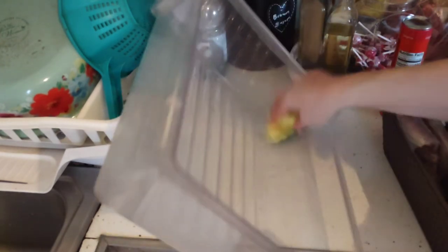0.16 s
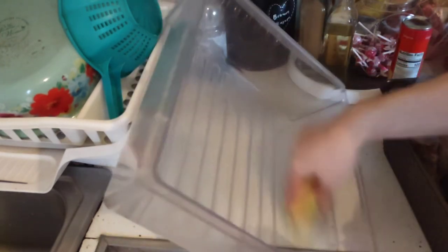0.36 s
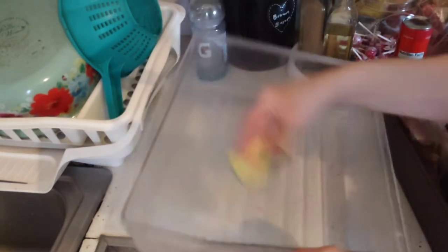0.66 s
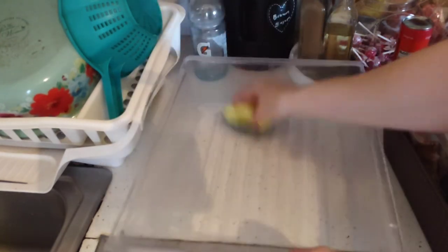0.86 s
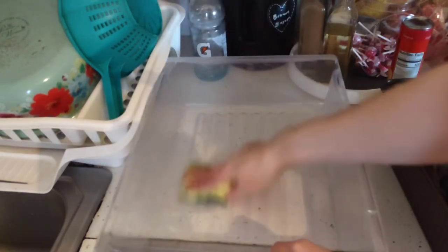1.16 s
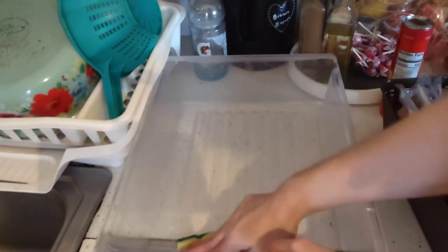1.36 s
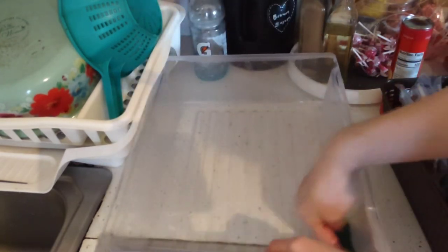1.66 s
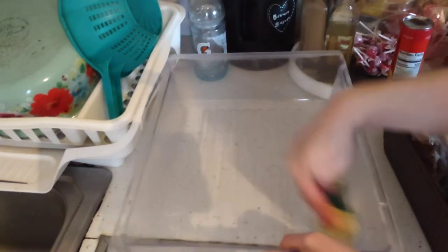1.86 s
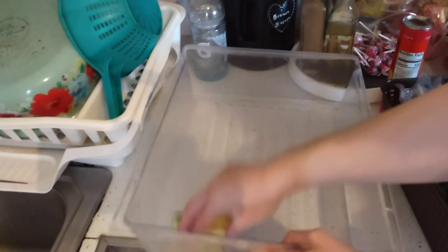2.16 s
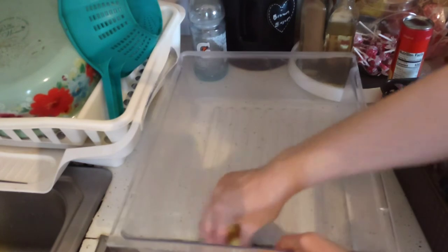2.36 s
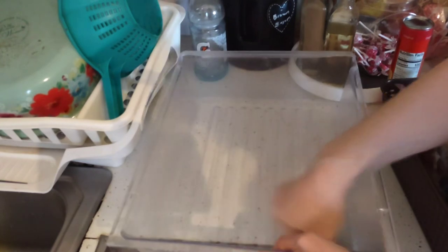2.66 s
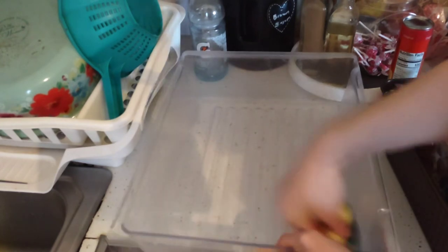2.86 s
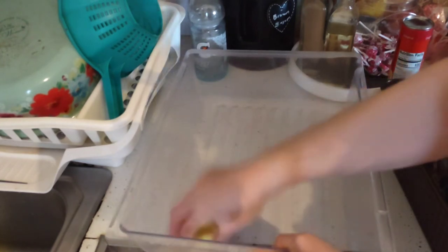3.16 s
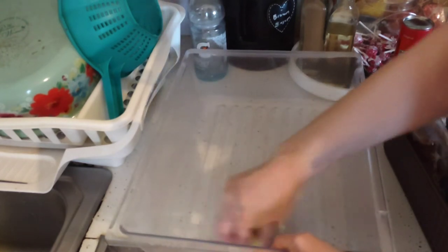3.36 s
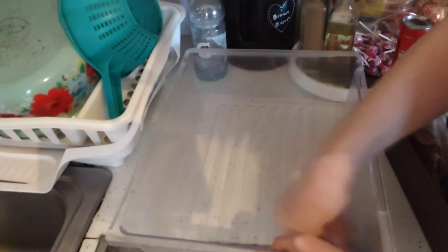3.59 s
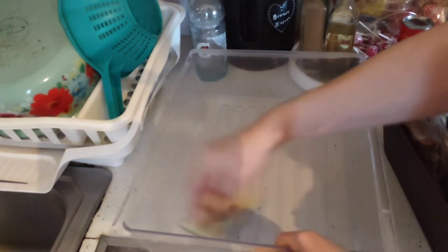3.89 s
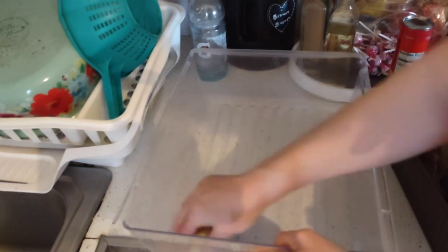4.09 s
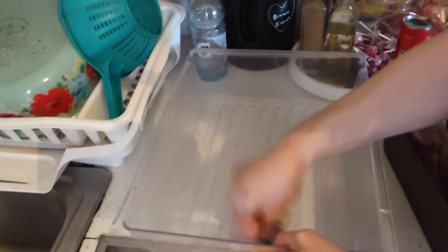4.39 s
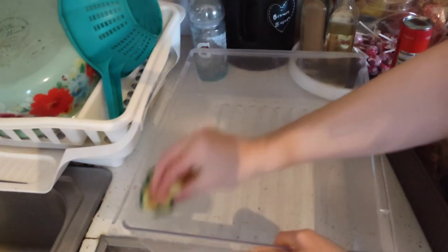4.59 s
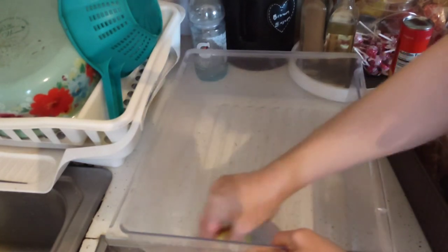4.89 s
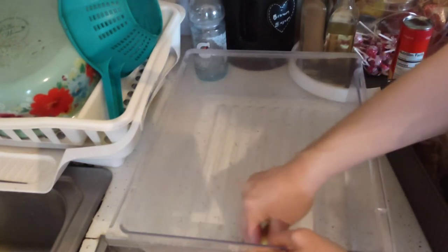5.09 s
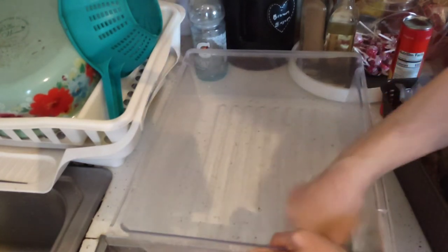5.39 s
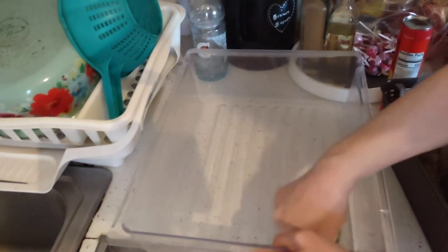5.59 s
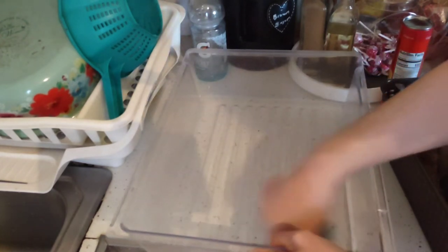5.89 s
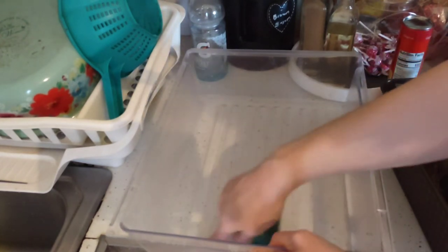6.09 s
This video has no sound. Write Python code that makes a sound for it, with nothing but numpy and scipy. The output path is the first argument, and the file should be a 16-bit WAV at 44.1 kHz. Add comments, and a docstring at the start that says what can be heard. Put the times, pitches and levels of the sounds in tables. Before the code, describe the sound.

Close-up scrubbing of a thin plastic bin: clattering as it is set down, then hissing wipes, resonant bumps and small squeaks over quiet room hum.

```python
"""A small kitchen with a low hum: a clear plastic drawer on the counter, scrubbed with a sponge.
Heard close, through two microphone ports, with a short room tail under the direct sound.
The drawer knocks as it is laid down and whenever the hand runs into a wall: decaying modes and noise.
Random snags of the sponge's fibres hiss and set the thin panels ringing; in the corners trains of
slips judder and swelling tones squeak."""
import sys
import numpy as np
from scipy import signal
from scipy.fft import rfft, irfft, next_fast_len
from scipy.io import wavfile
from scipy.ndimage import map_coordinates

SR = 44100
rng = np.random.default_rng(int(sys.argv[2]) if len(sys.argv) > 2 else 0)


def dump(signal):
    """Clip the signal to [-1, 1] and save it as 16-bit WAV at the path in sys.argv[1]."""
    limited = np.clip(np.atleast_2d(signal).T, -1, 1)
    pcm = np.round(limited * 32767).astype(np.int16)
    wavfile.write(sys.argv[1], SR, pcm)


N = 275184  # samples

# Levels in the tables are relative: most layers add a trim of their own in the mix.
# hum of the room, spectrum: f/Hz, level/dB
HUM_SPECTRUM = [(25, -36), (60, -16), (110, -11), (170, -6), (260, -1.5), (370, 3), (480, -10),
                (640, -13.5), (1000, -19.5), (2000, -32), (5000, -36.5), (10000, -65), (16000, -61)]
# decay of the kitchen: f/Hz, t60/s
KITCHEN_DECAY = [(100, 0.3), (500, 0.2), (3000, 0.22), (12000, 0.099)]
# likeness of left and right, 0-1: f/Hz, likeness
LEFT_RIGHT_LIKENESS = [(130, 0.96), (300, 0.92), (640, 0.43), (1200, 0.083), (3000, .02)]
# colour of each microphone port: f/Hz, level/dB
LEFT_PORT_COLOUR = [(330, 0), (520, 2), (780, 0), (1150, 3), (2700, 4), (4600, 3), (5450, 7), (6000, 2),
                    (7000, 3), (7700, -43), (8800, -1), (9400, 0), (10200, 10.5), (11900, 5.5),
                    (13200, -8.5), (15000, -9.5)]
RIGHT_PORT_COLOUR = [(330, 1), (520, 3), (780, 4.5), (1150, -2), (2700, 7), (4700, 1.5), (5450, 14.5),
                     (6200, 5), (7100, 9), (7800, 5), (8600, 16), (9400, -1), (10100, -21), (11400, -3.5),
                     (12100, -12), (12800, -13), (15000, -40)]
# broad wipes over the damp floor: t/s at full speed, hold/s, rise/s, fall/s, level/dB (20 dB ramps)
WIPE_GESTURES = [(0.209, 0.23, 0.073, 0.29, -51.5), (0.968, 0.43, 0.08, 0.16, -48)]
# swish of a wipe, spectrum: f/Hz, level/dB
SWISH_SPECTRUM = [(3000, -27), (7000, -8.5), (9000, -3), (10500, 1), (15000, -6)]
# damp plastic squeaking in the corner: t/s, length/s, level/dB
CORNER_SQUEAKS = [(1.794, 0.096, -42.5), (1.912, 0.044, -43.5)]
# tones of a squeak: f/Hz, level/dB
SQUEAK_PARTIALS = [(1700, -4), (2370, -4.5), (2640, -12), (5540, -12.5)]
# steady friction locked onto one panel mode: t/s, length/s, f/Hz, level/dB at the top of the swell
SINGING_MODES = [(1.5, 0.29, 661, -34.5), (1.516, 0.22, 395, -37.5), (1.626, 0.025, 647, -23.5),
                 (1.614, 0.043, 373.6, -29.5), (1.657, 0.019, 642, -21.5), (3.405, 0.037, 665, -36),
                 (3.455, 0.027, 692, -33), (4.156, 0.37, 1257, -48), (4.28, 0.11, 710, -39.5)]
# the sponge grips and slips: t/s, length/s, slip rate f/Hz, level/dB, roughness (0-1)
GRIP_SLIPS = [(1.763, 0.053, 137.7, -36.5, .7), (1.825, .036, 260.8, -28, 0.3),
              (1.858, 0.035, 245, -30, .2), (1.895, 0.066, 235, -44.5, .45), (2.739, 0.04, 120.5, -50, 0.2),
              (4.101, 0.054, 125, -60, 0.42), (5.366, 0.075, 131.4, -40, 0.35)]
# blows on the drawer: t/s, knock level/dB, counter thump level/dB, crack level/dB, contact pitch f/Hz
DRAWER_BLOWS = [(0.076, -72, -74, -39, 3480), (.269, -32, -48, -28, 1700), (.28, -33, -38.5, -42, 250),
                (.372, -48, -55, -37.5, 2300), (0.586, -32.5, -66, -24.5, 1720), (.591, -27, -65, -49, 344),
                (.624, -34, -48, -34, 587), (.765, -19.5, -33, -23, 1380), (.769, -24, -35, -38, 786),
                (0.787, -29.5, -31.5, -28, 420), (0.9, -32.5, -41, -58, 520), (.954, -21.5, -60, -23, 705),
                (1.185, -50, -62, -65, 685), (1.378, -53, -52, -38.5, 616), (1.763, -33, -57, -17, 2500),
                (1.803, -31.5, -65, -28, 710), (1.929, -46, -73, -53, 1100), (2.0, -42.5, -54, -66, 397),
                (2.246, -17, -38, -18, 1560), (2.254, -15.5, -25, -14, 530), (2.267, -17, -23, -17.5, 240),
                (2.291, -26.5, -35, -23, 230), (2.821, -37.5, -58, -39.5, 750), (2.864, -37, -55, -43, 800),
                (3.198, -31, -47.5, -45, 634), (3.662, -25.5, -40.5, -34, 660),
                (3.81, -29.5, -45, -27, 900), (4.085, -38.5, -61, -47, 1050),
                (4.104, -39, -41.5, -34.5, 765), (4.723, -48.5, -66, -59, 650),
                (5.552, -15.5, -33, -12.5, 675), (5.557, -19.5, -28.5, -40, 382),
                (5.598, -33, -40, -21.5, 750), (6.136, -54, -67, -74, 690)]
# ring of the drawer under a blow: f/Hz, level/dB, t60/s
DRAWER_MODES = [(243.6, -6.5, 0.27), (304, -5, 0.38), (346.7, 0, 0.2), (375.3, 2.5, 0.15), (421, 6, 0.19),
                (500, -3.5, 0.087), (613, -68, 0.054), (628.4, 3, 0.12), (681, 1, 0.12), (766.4, -8, 0.18),
                (859, -17, 0.38), (1004.6, 2.5, 0.13), (1083, -2.5, 0.094), (1363, -15, 0.095),
                (1564, -22, 0.12), (1627, -2.5, 0.053), (1810, -7.5, 0.067), (2025, -16, 0.049)]
# drawer and counter moving together: f/Hz, level/dB, t60/s
COUNTER_MODES = [(59, -25, 0.22), (104.7, 0.5, 0.17), (163, 5, 0.092), (202.4, 2.5, 0.13)]
# noise of a blow, spectra of its dense high modes and of its crack: f/Hz, level/dB
CLATTER_SPECTRUM = [(100, -10.5), (300, 3), (900, 2.5), (1800, -7.5), (3000, -11), (5000, -20.5),
                    (16000, -28.5)]
CRACK_SPECTRUM = [(300, 2), (1500, -14.5), (3000, -1), (7000, -0.5), (11000, -2.5), (16000, -15)]
# sponge strokes: t/s at full speed, hold/s, rise/s, fall/s (20 dB ramps), hiss level/dB,
# swell over the hold/dB, pressure/dB
SPONGE_STROKES = [(0.228, 0.06, 0.24, 0.12, -55, 17, 8.5), (0.51, 0.11, 0.26, 0.11, -62, -4, 17.5),
                  (0.898, 0.1, 0.054, 0.14, -54, 14, 5.5), (1.123, 0.046, 0.3, 0.19, -50.5, -6.5, -8),
                  (1.589, 0.094, 0.17, 0.071, -27.5, 10.5, 0), (1.776, 0.064, 0.075, 0.09, -46, -6.5, 14),
                  (1.974, 0.026, 0.057, 0.34, -70, -3, 19), (2.417, 0.19, 0.17, 0.1, -32, -7, -0.5),
                  (2.64, 0.081, 0.024, 0.12, -30, 0, -1), (3.342, 0.068, 0.11, 0.24, -33, 3.5, -3),
                  (3.417, 0.055, 0.022, 0.076, -35, -1, 4.5), (3.555, 0.074, 0.3, 0.15, -34, 3.5, 3.5),
                  (4.282, 0.12, 0.16, 0.043, -34.5, 2.5, 1), (4.757, 0.0086, 0.075, 0.025, -49, -1, -15),
                  (4.944, 0.15, 0.12, 0.14, -32, -6, -3), (5.184, 0.029, 0.018, 0.077, -41.5, -6, 4),
                  (5.282, 0.066, 0.12, 0.066, -30, 8, 2), (5.486, 0.007, 0.036, 0.029, -33, 0.5, -1.5),
                  (5.601, 0.031, 0.084, 0.051, -27.5, 5, 4), (5.7, 0.015, 0.067, 0.063, -31.5, 0, -5),
                  (5.79, 0.021, 0.031, 0.064, -32.5, -4, 4.5), (5.867, 0.023, 0.047, 0.12, -48, -1.5, -4)]
# hiss of the fibres, spectrum: f/Hz, level/dB
FIBRE_SPECTRUM = [(300, -33), (900, 3.5), (1600, -6.5), (2100, -5), (2700, 1), (4200, 1), (7000, 3),
                  (11000, 4.5), (16000, -3.5)]
# resonances of the panel under the sponge, and of the whole shell: f/Hz, width/Hz, level/dB
PANEL_RESONANCES = [(678, 44, -11.5), (701.3, 22.4, 2), (832, 87, -5.5), (1057, 70, -1.5),
                    (1238, 22, -12.5), (1435, 54, -10.5), (1634, 52, -13.5)]
SHELL_RESONANCES = [(317, 45, -23), (389, 20, -2), (418, 24, -2.5), (482, 16, -3.5)]

TOP_HZ = 15700  # band limit of the microphones
# each part against the hiss: level, growth toward the wall, and length of its fall as a ratio
PANEL_DB, PANEL_LEAN_DB_PER_S, PANEL_LINGER = -2.5, 37.5, 0.81
SHELL_DB, SHELL_LEAN_DB_PER_S, SHELL_LINGER = -13, 51.5, 1.8
SHELL_GROWS = 1.54  # dB of shell drone per dB of pressure
REST_HISS_DB, REST_PANEL_DB = -71, -69  # the sponge creeping between strokes, before the trims
NODES_DB, NODES_PER_S = 5.5, 12  # depth and rate at which a panel mode fades at its nodes
FOCUS_DB = 4  # loss of a mode an octave from the contact's pitch
# the whole shell giving way after each contact: delay, level, pitch, loss an octave away
FOLLOW_S, FOLLOW_DB, FOLLOW_HZ, FOLLOW_FOCUS_DB = 0.00565, -7, 380, 9
# time constant of a hard contact; dB of stretch per dB that the crack lies under the knock
ATTACK_S, SOFTENING = 0.00053, 0.62
SLOWING = 0.91  # slip rate at the end of a judder over that at its start
DRIFT = 0.012  # share by which a singing pitch wanders with the pressure


def amp(db):
    """Decibels to gain."""
    return 10 ** (np.asarray(db) / 20)


def unit(x):
    """Scale to rms 1."""
    return x / np.sqrt(np.mean(x ** 2) + 1e-20)


def along(points, hz):
    """Read (f/Hz, value) points on a log frequency axis."""
    f, value = np.transpose(points)
    return np.interp(np.log(hz + 1), np.log(f + 1), value)


def wobble(rate):
    """A smooth random curve with `rate` knots a second."""
    knots = rng.standard_normal(int(N * rate / SR) + 4)
    return map_coordinates(knots, [np.arange(N) * rate / SR])


def filtered(x, response):
    """Multiply the spectrum of x by a complex response of frequency."""
    n = x.shape[-1]
    padded = 2 * next_fast_len(n // 2 + 8192)
    spectrum = rfft(x, padded) * response(np.fft.rfftfreq(padded, 1 / SR))
    return irfft(spectrum, padded)[..., :n]


def colour(points):
    """Causal minimum-phase response with the given (f/Hz, level/dB), by folding the cepstrum."""
    def response(hz):
        cepstrum = irfft(np.log(amp(along(points, hz))))
        half = len(cepstrum) // 2
        cepstrum[1:half] *= 2
        cepstrum[half + 1:] = 0
        return np.exp(rfft(cepstrum))
    return response


def resonances(modes):
    """Causal response of damped resonators (f/Hz, width/Hz, level/dB), summed."""
    def response(f):
        return sum(amp(db) * 1j * f * width / (centre * centre - f * f + 1j * f * width)
                   for centre, width, db in modes)
    return response


def spread(pair):
    """Blend two unrelated signals into left and right, alike in the bass and unlike in the treble."""
    def mid_and_side(hz):
        turn = np.arccos(np.clip(along(LEFT_RIGHT_LIKENESS, hz), -1, 1)) / 2
        return np.array([np.cos(turn), np.sin(turn)])
    mid, side = filtered(pair, mid_and_side)
    return np.array([mid + side, mid - side])


def noise(spectrum, size):
    """Coloured stereo noise of rms 1."""
    return unit(filtered(spread(rng.standard_normal((2, size))), colour(spectrum)))


def add(track, s, sound):
    """Mix a sound in at time s."""
    part = track[:, max(round(s * SR), 0):][:, :sound.shape[-1]]
    part += sound[..., :part.shape[-1]]


def walls(x, echo, count=14):
    """Quick reflections between the drawer's walls comb the treble and make it hollow."""
    paths = np.zeros((2, SR // 100))
    for ear in paths:
        delays = rng.integers(SR // 2000, len(ear), count)  # 0.5 to 10 ms
        ear[delays] = echo * rng.choice([-1, 1], count)
    echoes = signal.fftconvolve(x, paths, axes=1)[:, :x.shape[-1]]
    echoes = filtered(echoes, colour([(400, -12.5), (1300, 4.5)]))
    return (x + echoes) / np.sqrt(1 + count * echo ** 2)


def gesture(t, hold, rise, fall):
    """Level in dB of a hand movement at full speed from t = 0: rise, hold, fall."""
    return -20 * (np.maximum(-t, 0) / rise + np.maximum(t - hold, 0) / fall)


def hum():
    """The low hum of the kitchen: steady noise weighted to the bass."""
    return amp(-54.5) * noise(HUM_SPECTRUM, size=N)


def room(x):
    """The kitchen's short, diffuse answer: noise decaying at its own pace in each band."""
    hz, t, bands = signal.stft(rng.standard_normal((2, SR // 2)), SR, nperseg=256)
    decay = amp(-60 * t / along(KITCHEN_DECAY, hz)[:, None])
    tail = spread(signal.istft(bands * decay, SR, nperseg=256)[1])
    tail = np.pad(tail / np.linalg.norm(tail[0]), ((0, 0), (SR // 200, 0)))  # starts 5 ms late
    return signal.fftconvolve(x, tail, axes=1)[:, :N]


def wipes():
    """Drawn lightly over the damp floor, the sponge gives a fine, smooth swish."""
    t = np.arange(N) / SR
    level = sum(amp(db + gesture(t - s, hold, rise, fall)) for s, hold, rise, fall, db in WIPE_GESTURES)
    return level * noise(SWISH_SPECTRUM, size=N)


def squeaks():
    """A tight rub keeps a mode singing; the higher the mode, the more its pitch and strength rasp."""
    out = np.zeros((2, N))
    high = [(s, length, hz, db + tone_db)
            for s, length, db in CORNER_SQUEAKS for hz, tone_db in SQUEAK_PARTIALS]
    for s, length, hz, db in SINGING_MODES + high:
        swell = np.hanning(int(length * SR))
        n = len(swell)
        pitch = hz * (1 + DRIFT * wobble(30)[:n])
        pitch = pitch + 28 * (hz / 700) ** 0.85 * wobble(300)[:n]
        rasp = 1 + 0.31 * min(hz / 1500, 1) * wobble(381)[:n]
        tone = np.sin(2 * np.pi * np.cumsum(pitch) / SR)
        add(out, s, amp(db) * np.sqrt(2) * swell * rasp * tone)
    return out


def judders():
    """The gripping sponge slips in quick jerks that make the wall groan."""
    out, t = np.zeros((2, N)), np.arange(SR // 4) / SR
    wall = colour([(40, -25), (120, -1.5), (250, 5.5), (390, 7.5), (470, -13.5),
                   (1000, -15.0), (2500, -26.5), (8000, -46)])
    for s, length, slip_hz, db, rough in GRIP_SLIPS:
        rate = np.interp(t, [0, length], [slip_hz, SLOWING * slip_hz])
        rate = rate * np.exp(0.29 * rough * wobble(150)[:len(t)])
        slips = np.diff(np.floor(np.cumsum(rate) / SR), prepend=-1)  # one impulse a cycle
        swell = np.sqrt(np.abs(np.sin(np.pi * np.minimum(t / length, 1))))
        jerks = slips * swell * (1 + rough * rng.standard_normal(len(t)))
        groan = filtered(jerks, wall)
        # little sounds below the slip rate
        groan = filtered(groan, colour([(slip_hz / 2, -20), (0.93 * slip_hz, 0)]))
        add(out, s, amp(db) * unit(groan) * np.sqrt(length / t[-1]))
    return out


def ringing(modes, t, attack, contact_hz, focus_db, width):
    """Decaying modes at fresh strengths; those near the contact's pitch are struck hardest."""
    hz, db, t60 = np.transpose(modes)[:, :, None]
    chance = rng.standard_normal((3, len(modes), 1))
    gain = amp(db + 0.59 * chance[0] - focus_db * np.log2(hz / contact_hz) ** 2)
    phase = 2 * np.pi * hz * (1 + 0.016 * chance[1]) * t
    skew = width * np.minimum(hz / 1000, 1) * chance[2]  # short waves reach the ports out of step
    sign = (-1) ** np.arange(len(modes))[:, None]
    fade = sign * gain / np.linalg.norm(gain) * amp(-60 * t / t60)
    pair = np.array([np.sum(fade * np.sin(phase + side * skew), axis=0) for side in (-1, 1)])
    return pair * (1 - np.exp(-t / attack))


def knocks():
    """A blow pushes air, cracks, clatters in dense high modes, rings drawer and shell, thumps the counter."""
    out, t = np.zeros((2, N)), np.arange(SR // 2) / SR
    for s, db, thump_db, crack_db, contact_hz in DRAWER_BLOWS:
        u = np.pi * contact_hz * t
        push = np.sin(2 * u) * np.exp(-u / 2)
        push = filtered(push, colour([(20, -40), (70, -28.5), (280, 1)]))  # small panel, little bass
        ring = ringing(DRAWER_MODES, t, attack=0.0014, contact_hz=contact_hz,
                       focus_db=FOCUS_DB, width=0.85)
        follow = ringing(DRAWER_MODES, t, attack=0.00098, contact_hz=FOLLOW_HZ,
                         focus_db=FOLLOW_FOCUS_DB, width=0.5)
        thump = ringing(COUNTER_MODES, t, attack=0.003, contact_hz=130, focus_db=0, width=0.3)
        # each noise has a fast and a slow decay
        clatter_fade = amp(-60 * t / 0.02) + amp(-4.5 - 60 * t / 0.18)
        clatter = noise(CLATTER_SPECTRUM, size=len(t)) * clatter_fade * (contact_hz / 700) ** 0.27
        crack_fade = amp(-60 * t / 0.012) + amp(-18.5 - 60 * t / 0.064)
        crack = noise(CRACK_SPECTRUM, size=len(t)) * crack_fade
        # padded by the sponge, a blow starts softly
        attack = ATTACK_S * amp(SOFTENING * np.clip(db - crack_db, 0, 20))
        snap = walls(amp(db - 4.0) * clatter + amp(crack_db) * crack, echo=0.12)
        snap = snap * (1 - np.exp(-t / attack))
        push = amp(db + 9) * np.sqrt(ATTACK_S / attack) * push
        add(out, s, push + amp(db + 2.5) * ring + amp(thump_db + 3.0) * thump + snap)
        add(out, s + FOLLOW_S, amp(db + FOLLOW_DB) * follow)
    return out


def snags(per_second, scatter_db):
    """Tiny impulses of fibres catching and letting go at random moments."""
    caught = rng.random(N) < per_second / SR
    strength = amp(scatter_db * rng.standard_normal(N))
    return spread(caught * strength * rng.standard_normal((2, N)))


def roaming(per_second, count=3):
    """Snags heard through wall reflections that change as the sponge travels."""
    weights = amp(7.8 * np.array([wobble(7) for _ in range(count)]))
    weights /= np.linalg.norm(weights, axis=0)
    return sum(w * walls(snags(per_second=per_second, scatter_db=3.0), echo=0.18) for w in weights)


def panel_modes(drag):
    """The drag's energy passes from mode to mode as the sponge crosses their nodes."""
    hz, width, db = np.transpose(PANEL_RESONANCES)[:, :, None]
    weights = amp(NODES_DB * np.array([wobble(NODES_PER_S) for _ in PANEL_RESONANCES]))
    weights /= np.sqrt(np.sum((weights * amp(db)) ** 2 * np.abs(width), axis=0))
    return sum(w * filtered(drag, resonances([mode])) for w, mode in zip(weights, PANEL_RESONANCES))


def stroke_levels():
    """Hiss, panel and shell in dB: speed drives all three, and the hand presses harder near the wall."""
    clock = np.arange(0, N, 64) / SR
    s, hold, rise, fall, db, swell_db, pressure_db = np.transpose(SPONGE_STROKES)[:, :, None]
    t = clock - s
    effort = db + swell_db * (np.clip(t / hold, 0, 1) - 0.5)
    to_go = np.maximum(hold - t, 0)  # s left before the hold ends

    hiss = effort + gesture(t, hold, rise, fall)
    panel = effort + gesture(t, hold, rise, fall * PANEL_LINGER)
    panel = panel + PANEL_DB + pressure_db - PANEL_LEAN_DB_PER_S * to_go
    shell = effort + gesture(t, hold, rise, fall * SHELL_LINGER)
    shell = shell + SHELL_DB + SHELL_GROWS * pressure_db - SHELL_LEAN_DB_PER_S * to_go

    def total(levels, rest):
        power = np.sum(amp(levels) ** 2, axis=0) + rest ** 2 + 1e-20
        return np.interp(np.arange(N) / SR, clock, 10 * np.log10(power))
    return total(hiss, amp(REST_HISS_DB)), total(panel, amp(REST_PANEL_DB)), total(shell, 0)


def sponge():
    """Snagging fibres hiss and drive the drawer's panels; the grip flutters as the sponge slides."""
    hiss_db, panel_db, shell_db = stroke_levels()
    grip = wobble(70) + 0.73 * wobble(20)
    fibres = filtered(roaming(per_second=5000), colour(FIBRE_SPECTRUM))
    drag = snags(per_second=2500, scatter_db=-2.0)
    panel_colour = colour([(150, -11.5), (450, -21.5), (600, 2.0), (1800, -0.5), (5000, 0.0)])
    panel = filtered(panel_modes(drag), panel_colour)
    shell_colour = colour([(60, -9), (200, -24.0), (320, -1.0), (520, -8), (1200, -18.0)])
    shell = filtered(filtered(drag, resonances(SHELL_RESONANCES)), shell_colour)
    hiss = amp(hiss_db - 2.0 + 1.6 * grip) * unit(fibres)
    ring = amp(panel_db - 1 + 0.24 * grip) * unit(panel)
    drone = amp(shell_db - 1.5) * unit(shell)
    return hiss + ring + drone


def scene():
    """Scrubbing and knocks close by, the kitchen's answer to both, and its hum."""
    rub = sponge() + wipes()
    blows = knocks() + judders() + squeaks()
    answer = room(amp(-7.5) * blows + amp(-11.5) * rub)
    return rub + blows + answer + hum()


def record(dry):
    """Each microphone port colours the treble in its own way; nothing is kept above the band limit."""
    left = filtered(dry[0], colour(LEFT_PORT_COLOUR))
    right = filtered(dry[1], colour(RIGHT_PORT_COLOUR))
    return filtered(np.array([left, right]), lambda hz: hz < TOP_HZ)


dry = scene()
out = record(dry)
dump(out)
```